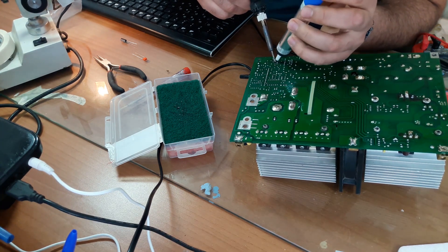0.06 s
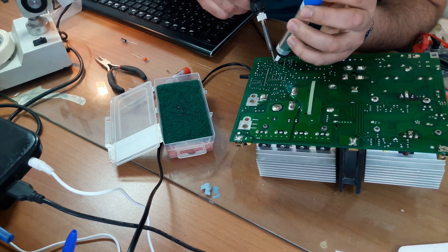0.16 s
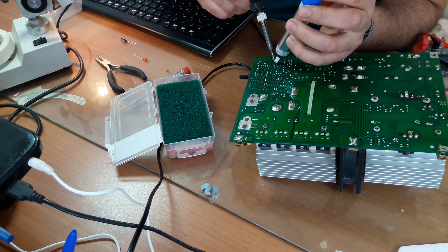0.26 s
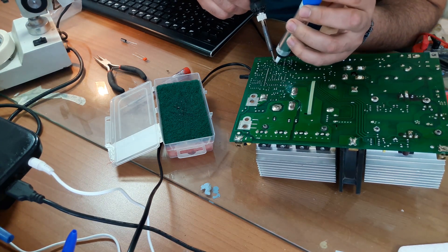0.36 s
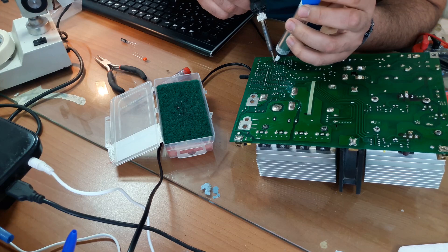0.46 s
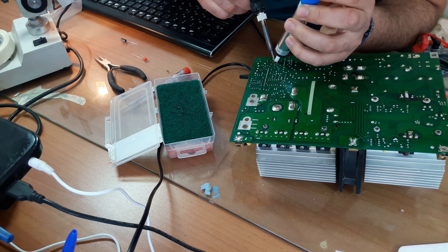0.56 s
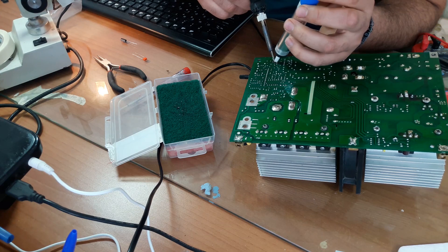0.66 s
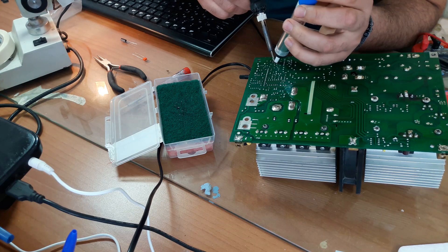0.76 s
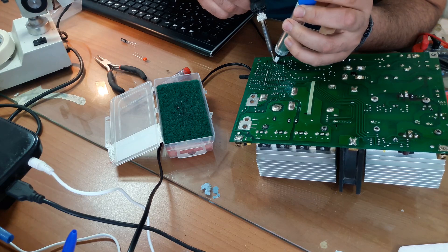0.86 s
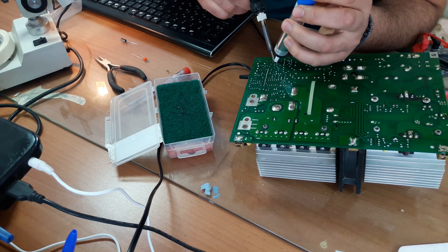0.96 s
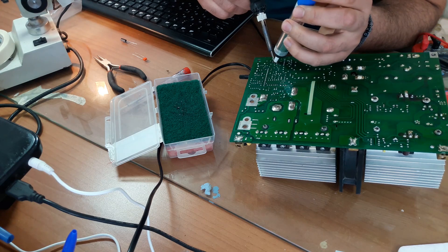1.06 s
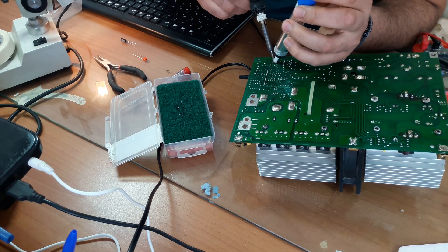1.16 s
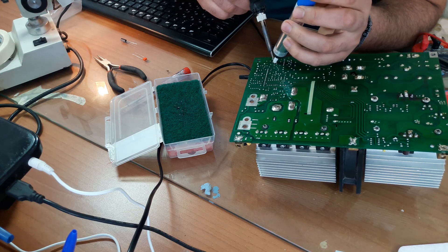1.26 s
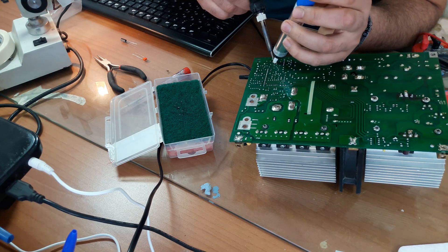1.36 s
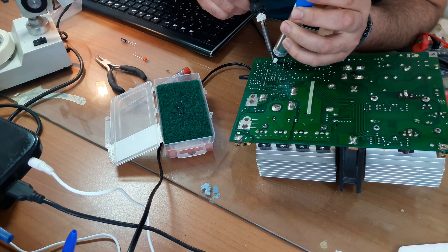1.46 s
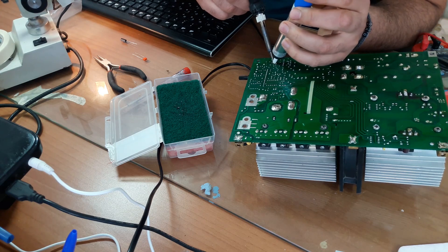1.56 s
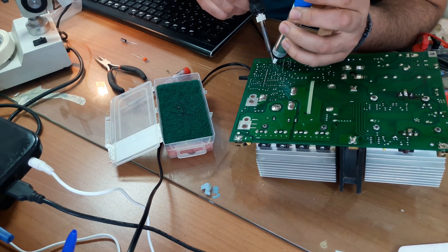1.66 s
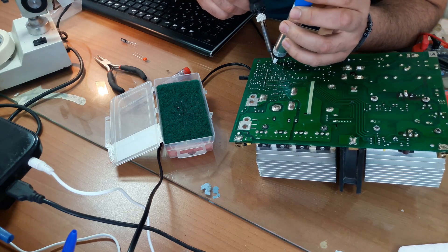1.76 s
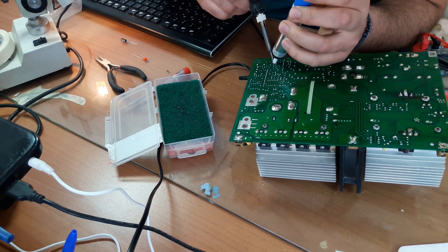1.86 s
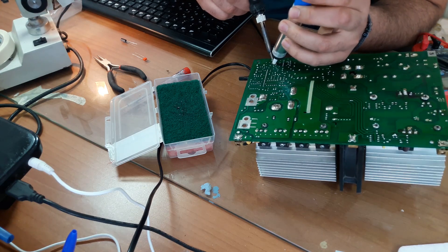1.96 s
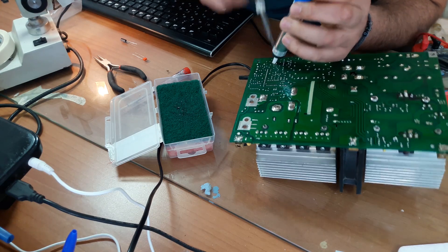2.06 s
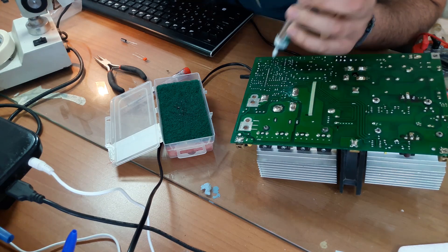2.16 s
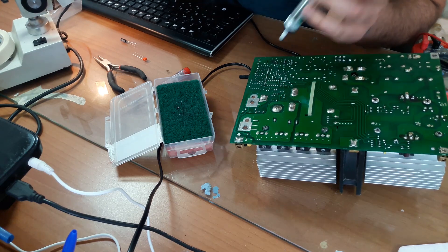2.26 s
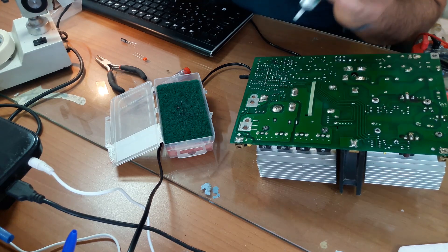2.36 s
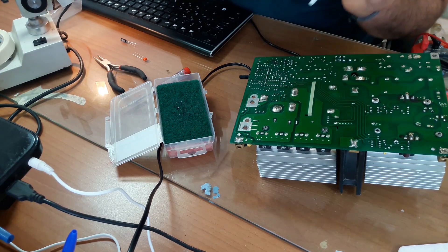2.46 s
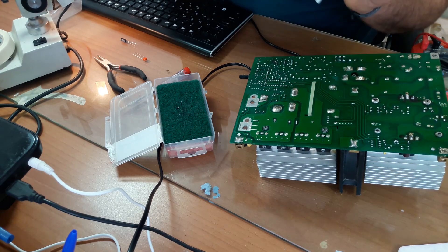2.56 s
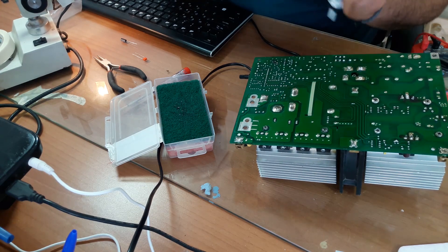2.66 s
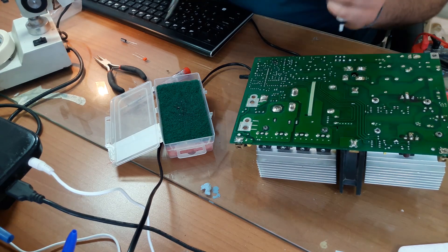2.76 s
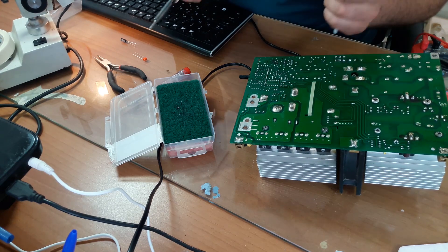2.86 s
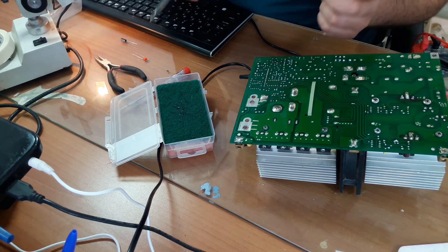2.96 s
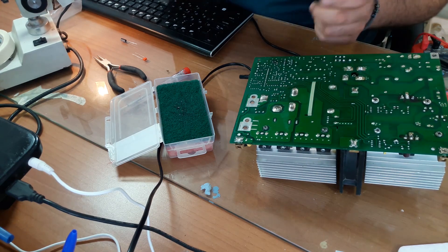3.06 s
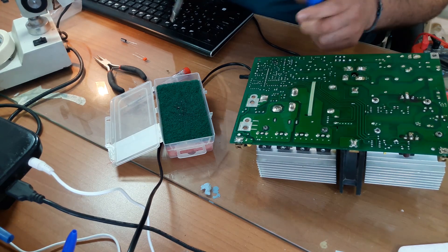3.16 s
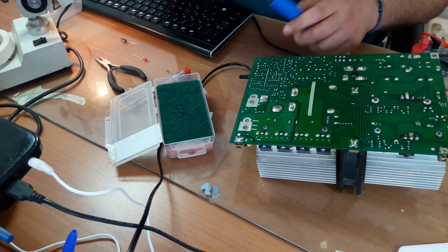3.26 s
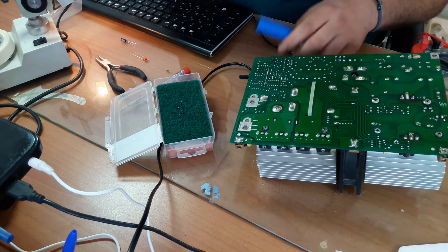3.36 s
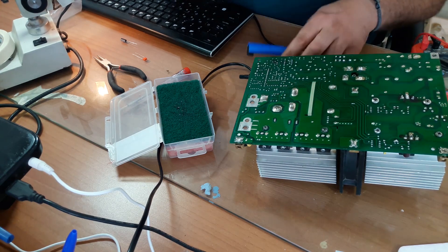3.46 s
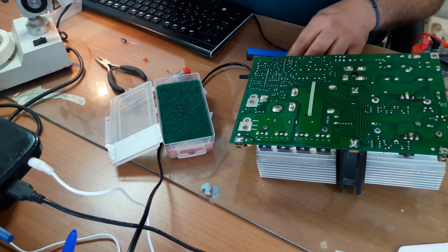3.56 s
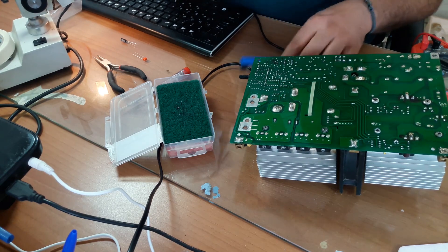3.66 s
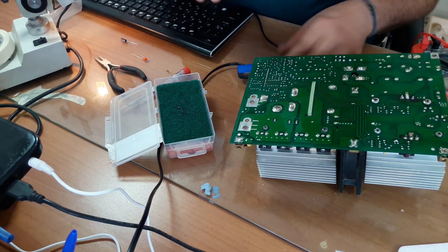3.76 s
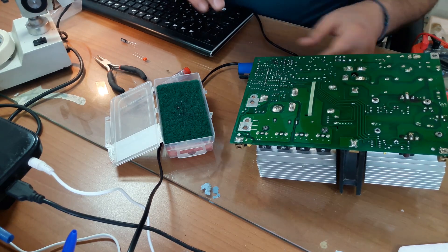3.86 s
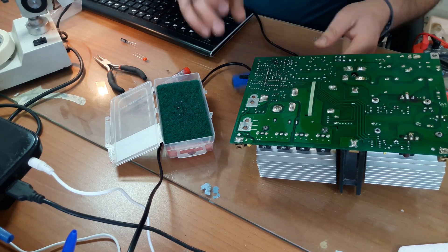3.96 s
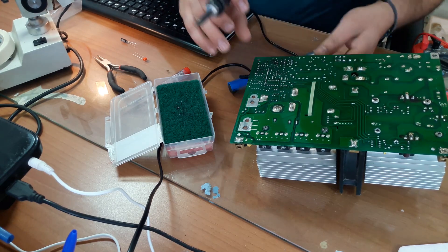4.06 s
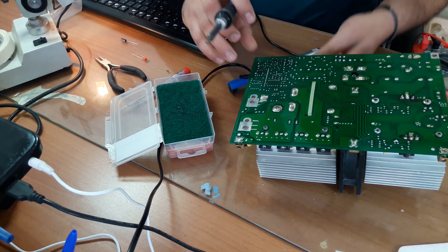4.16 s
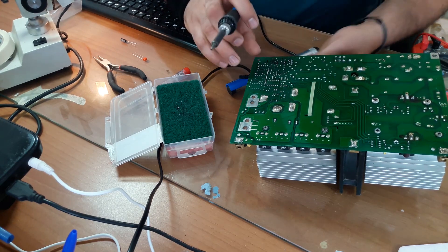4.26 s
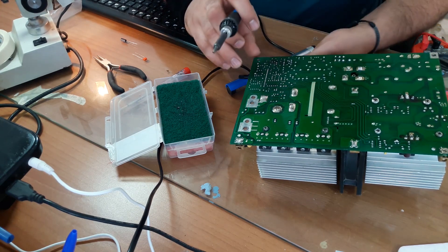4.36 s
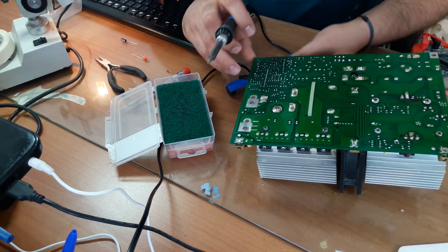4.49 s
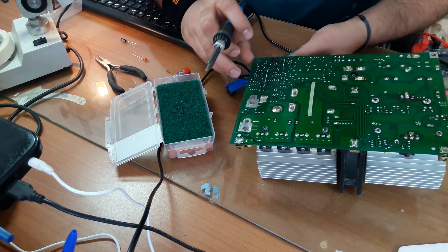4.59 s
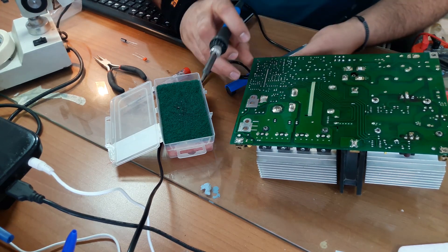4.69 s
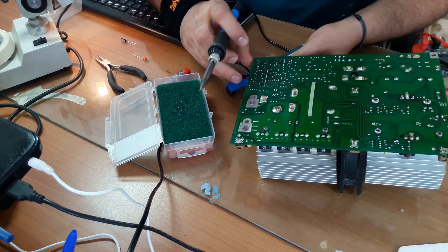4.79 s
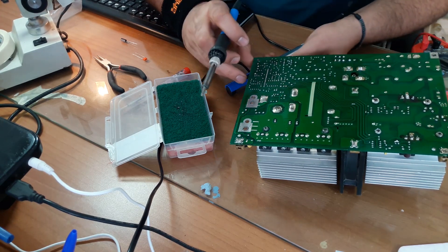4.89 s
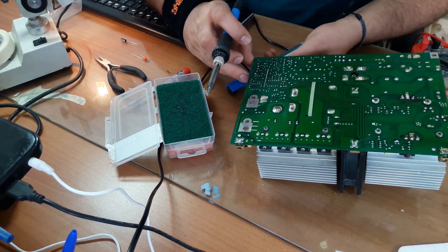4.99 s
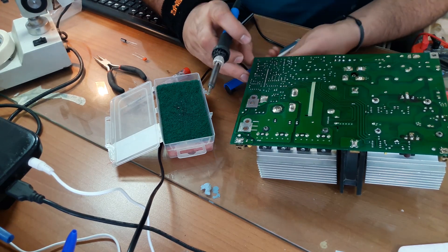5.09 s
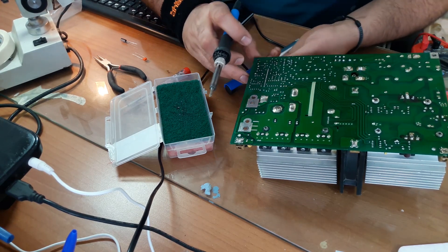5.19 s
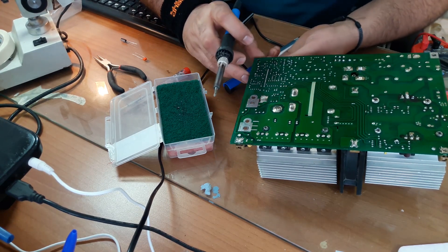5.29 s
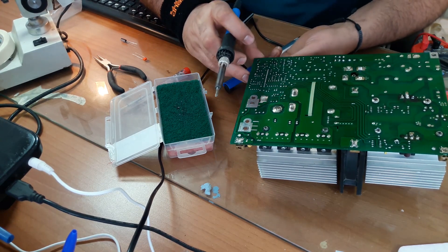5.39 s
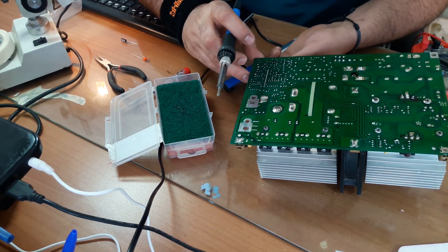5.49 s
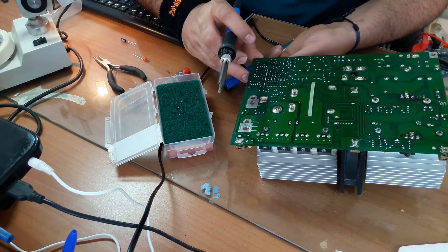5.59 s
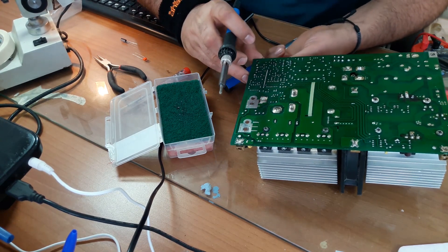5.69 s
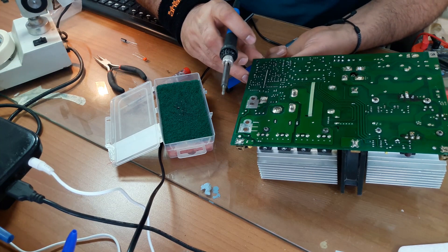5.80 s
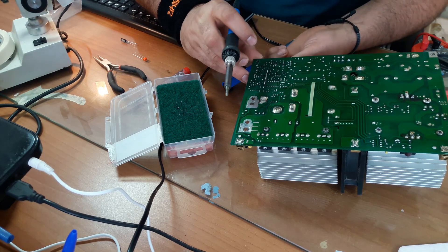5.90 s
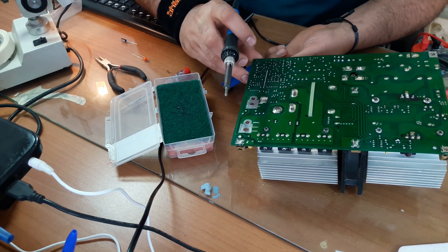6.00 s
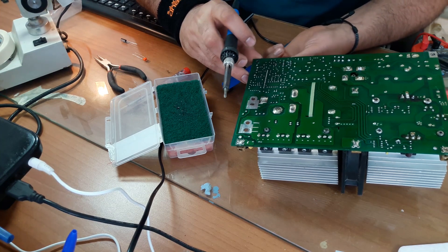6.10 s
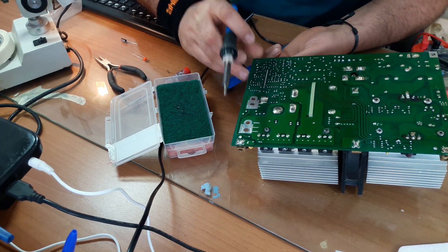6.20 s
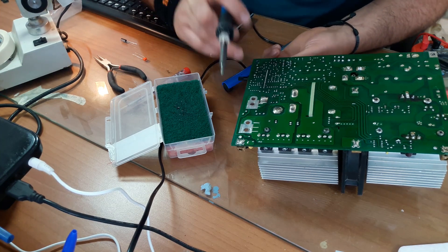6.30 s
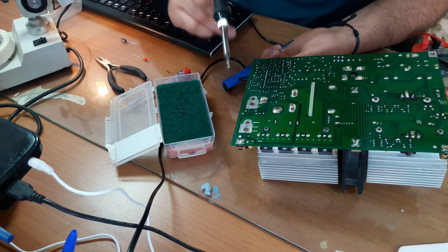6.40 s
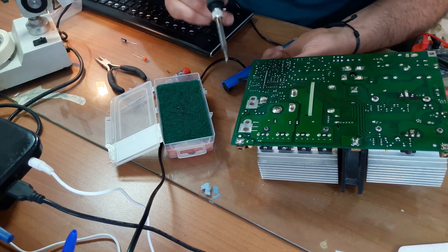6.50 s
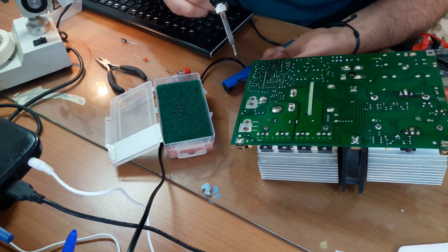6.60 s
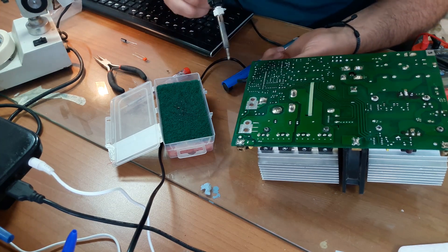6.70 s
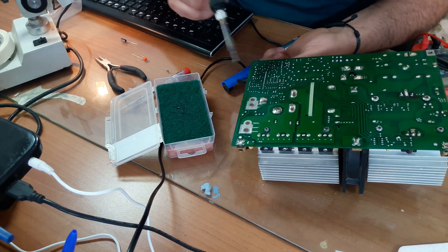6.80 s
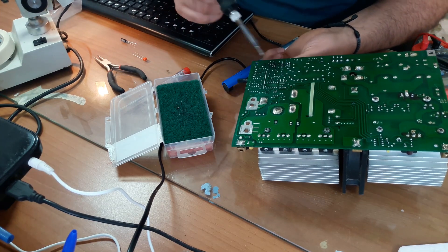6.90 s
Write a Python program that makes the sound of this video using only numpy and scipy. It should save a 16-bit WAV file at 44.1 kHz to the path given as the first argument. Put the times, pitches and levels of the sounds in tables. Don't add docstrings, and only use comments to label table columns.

```python
import sys
import numpy as np
from scipy import signal
from scipy.fft import rfft, irfft, next_fast_len
from scipy.io import wavfile
from scipy.ndimage import map_coordinates

SR = 44100
rng = np.random.default_rng(int(sys.argv[2]) if len(sys.argv) > 2 else 0)


def nominal_scale(level):
    x = np.asarray(level, float) / 20
    return 10 ** x


def unload_wav(signal):
    wavfile.write(
        sys.argv[1],
        SR,
        np.round(np.clip(np.atleast_2d(signal).T, -1, 1) * 32767).astype(np.int16),
    )


N = 306142
SPAN = 2 ** 16


def unit(x):
    return x / np.sqrt(np.mean(x ** 2) + 1e-20)


def along(points, hz):
    f, v = np.transpose(points)
    return np.interp(np.log(hz + 1), np.log(f + 1), v)


def curves(rows):
    s, *cols = np.transpose(rows)
    return [np.interp(np.arange(N) / SR, s, c) for c in cols]


def wobble(rate):
    knots = rng.standard_normal(int(N * rate / SR) + 4)
    return map_coordinates(knots, [np.arange(N) * rate / SR])


def strokes(rows, rise, fall):
    t = np.arange(N) / SR
    levels = []
    for s, hold, db in rows:
        before, after = np.maximum(s - t, 0), np.maximum(t - s - hold, 0)
        levels.append(db - rise * before - fall * after)
    return np.max(levels, axis=0)


def filtered(x, response):
    n = x.shape[-1]
    m = next_fast_len(n + SR // 4)
    return irfft(rfft(x, m) * response(np.fft.rfftfreq(m, 1 / SR)), m)[..., :n]


def body(modes):
    def response(f):
        total = 0
        for k, (centre, width, db) in enumerate(modes):
            damping = 1j * f * abs(width)
            total = total + (-1) ** k * nominal_scale(db) * damping / (centre * centre - f * f + damping)
        return total
    return response


def spread(pair, colour=lambda hz: 1):
    # f/Hz, left-right likeness
    likeness = [(130, 0.94), (290, 0.81), (640, 0.56), (1400, 0), (16000, 0.0082)]
    turn = lambda hz: np.arccos(np.clip(along(likeness, hz), -1, 1)) / 2
    mid, side = filtered(pair, lambda hz: colour(hz) * np.array([np.cos(turn(hz)), np.sin(turn(hz))]))
    return np.array([mid + side, mid - side])


def add(out, x, s):
    part = out[..., round(s * SR):][..., :x.shape[-1]]
    part += x[..., :part.shape[-1]]


def tails(count):
    # f/Hz, t60/s
    decay = [(100, 0.68), (300, 0.59), (800, .45), (2000, 0.45), (5000, 0.44), (10000, 0.35), (15000, 0.11)]
    # f/Hz, level/dB
    wall_colour = [(100, -1), (400, -3), (1000, -0.4), (3000, -2), (8000, -5.5), (15000, 3)]
    hz, t, z = signal.stft(rng.standard_normal((2, count, 3 * SR // 4)), SR, nperseg=256)
    fall_db = -60 * t / along(decay, hz)[:, None]
    two_slopes = nominal_scale(fall_db) + nominal_scale(-10.5 + 0.5 * fall_db)
    tail = signal.istft(z * two_slopes, SR, nperseg=256)[1]
    tail = tail * (1 - np.exp(-np.arange(tail.shape[-1]) / SR / 0.0093))
    pairs = [spread(tail[:, k]) for k in range(count)]
    colour = nominal_scale(along(wall_colour, np.fft.rfftfreq(SPAN, 1 / SR)))
    return [colour * rfft(p / np.linalg.norm(p[0]), SPAN) for p in pairs]


def heard(spectrum, room, pan_db, lag_s, wet_db):
    f = np.fft.rfftfreq(SPAN, 1 / SR)
    direct = nominal_scale([[pan_db / 2], [-pan_db / 2]]) * np.array([np.exp(-2j * np.pi * f * lag_s), np.ones(len(f))])
    return spectrum * (direct + nominal_scale(wet_db) * room)


def chatter(contacts, rule, count):
    s, db, cut_hz = contacts[-1]
    gap, grows, loss_db, keeps = rule
    k = np.arange(1, count + 1)
    times = s + np.cumsum(gap * grows ** (k - 1))
    return contacts + list(zip(times, db - loss_db * k, cut_hz * keeps ** k))


def struck(out, rooms, contacts, modes, pan_db, lag_s, wet_db, grit_hz, thin_hz=25):
    f, t = np.fft.rfftfreq(SPAN, 1 / SR), np.arange(256) / SR
    start, total = contacts[0][0] - .01, 0
    ring = body(modes)(f) * (1j * f / (thin_hz + 1j * f)) ** 3
    rough = f ** 2 / (f ** 2 + grit_hz ** 2)
    for k, (s, db, cut_hz) in enumerate(contacts):
        burst = rng.standard_normal(len(t)) * np.exp(-t / .0008)
        grit = rfft(burst / np.linalg.norm(burst), SPAN)
        even = ring / (1 + 1j * f / cut_hz) ** 2
        blow = even * (1 - rough + rough * grit)
        place = nominal_scale(db) / np.abs(irfft(blow, SPAN)).max() * np.exp(-2j * np.pi * f * (s - start))
        room = nominal_scale(wet_db) * even * rooms[k % len(rooms)]
        total = total + place * (heard(blow, 0, pan_db, lag_s, wet_db) + room)
    sound = np.zeros((2, N))
    add(sound, irfft(total, SPAN), start)
    return out + sound


def background():
    # t/s, level/dB
    load = [(0, -49), (.25, -57.5), (.8, -55), (1, -64.5), (1.7, -59.5), (2.3, -55), (3, -70), (3.8, -70),
            (4.3, -63), (5, -66.5), (5.7, -62), (6.2, -61), (6.45, -55.5), (6.94, -68.5)]
    # t/s, length/s, f/Hz, level/dB
    whines = [(1.45, 0.1, 500, -83), (1.7, 0.16, 487, -69.5), (5.96, 0.2, 530, -66.5),
              (6.196, 0.12, 685, -71), (6.6, .18, 530, -62)]
    # f/Hz, density/dB per Hz
    room_tone = [(33, -26), (40, -11), (65, -10), (149, -5), (174, -9), (220, -15.5), (303, -16.5),
                 (417, -20), (528, -19.5), (640, -21), (683, -21.5), (902, -17.5), (1220, -21.5),
                 (2220, -26), (5000, -45), (6500, -82.5), (11000, -120)]
    # f/Hz, width/Hz, level/dB
    standing = [(200, 32, -2.5), (300, 34, 0.5), (330, 34, 2), (391, 30, 1), (492, 16, 4), (577, 14, 3),
                (694.7, 10, 4.5)]
    # f/Hz, density/dB per Hz
    port_hiss = [(1180, -34.5), (2000, -13), (2980, -7), (3460, -6.5), (3810, -8), (7450, -16),
                 (9130, -16.5), (15100, -5.5), (16100, -18.5), (16500, -45)]
    # f/Hz, left minus right/dB
    tilt = [(60, -3), (240, -2.5), (950, -2), (3770, -1), (15000, 1)]
    drone_db, = curves(load)
    fast_hz, slow_hz, slows_at_s, slowing_s = 163.1, 143.6, .9, 0.053
    slowing = 1 - np.tanh((np.arange(N) / SR - slows_at_s) / slowing_s)
    hz = slow_hz + (fast_hz - slow_hz) / 2 * slowing
    under_db = -64.5 + .6 * (drone_db - drone_db.mean())
    drone = np.sin(2 * np.pi * np.cumsum(hz + 7 * wobble(18)) / SR) * nominal_scale(drone_db - 0.5 + 4 * wobble(28))
    under_phase = 2 * np.pi * np.cumsum(98 + 9 * wobble(15)) / SR
    drone += np.sin(under_phase) * nominal_scale(under_db + 2.2 * wobble(20))
    for s, length, pitch_hz, db in whines:
        t = np.arange(round(abs(length) * SR)) / SR
        phase = 2 * np.pi * pitch_hz * t + 1.0 * np.sin(2 * np.pi * 11 * t)
        add(drone, nominal_scale(db) * np.hanning(len(t)) ** .5 * np.sqrt(2) * np.sin(phase), s)

    rumble_db = np.maximum(strokes([(3.6, 2.9, -58)], rise=3.2, fall=3.2), -59.5)
    colour = lambda f: nominal_scale(along(room_tone, f)) * (1 + np.abs(body(standing)(f)))
    rumble = unit(spread(rng.standard_normal((2, N)), colour)) * nominal_scale(rumble_db + 0.22 * wobble(9.6))
    hiss = nominal_scale(-74.5) * unit(filtered(rng.standard_normal((2, N)), lambda f: nominal_scale(along(port_hiss, f))))
    lean = lambda f: nominal_scale(along(tilt, f) * np.array([[.5], [-.5]]))
    return filtered(rumble + drone + hiss, lean)


def pump(rooms):
    # t/s, peak level/dB, contact cut-off f/Hz
    catch = [(1.9953, -24, 39920), (1.9962, -20, 39800), (1.9972, -16.5, 40130)]
    # t/s, peak level/dB, contact cut-off f/Hz
    stop = [(2.0151, -3, 12000)]
    # t/s, peak level/dB
    far_wall = [(2.028, -26), (2.0352, -26), (2.0403, -19), (2.052, -31)]
    # t/s, peak level/dB, contact cut-off f/Hz
    cocking = [(2.49, -40.5, 400), (2.5137, -35.5, 300), (2.536, -32, 331), (2.568, -31, 328),
               (2.633, -52.5, 400)]
    # t/s, peak level/dB, contact cut-off f/Hz
    locking = [(2.489, -52.5, 5000), (2.535, -49, 2500), (2.572, -39.5, 4000), (2.576, -57, 4000)]
    # t/s, peak level/dB, contact cut-off f/Hz
    laying = [(3.7063, -20.5, 4000), (3.708, -26, 4000), (3.7113, -23.5, 7000), (3.769, -44, 3000)]
    # f/Hz, width/Hz, level/dB
    latch = [(450, 400, -8.5), (1700, 410, 0), (2600, 760, -1), (4600, 810, 0), (6800, 1800, -6),
             (9000, 1800, -5.5), (12800, 4900, -3.5), (15700, 2000, -3)]
    barrel = [(229.5, 210, -18.5), (390, 95, -7.5), (530, 120, -9), (670, 160, -1.5), (875, 123, 0.5),
              (1277, 140, -0.5), (1800, 140, 1.5), (2200, 160, -3), (2790, 400, -11), (3170, 290, -11),
              (4140, 830, -14.5), (5300, 500, -13.5), (6055, 460, -12), (7900, 2800, -18.5),
              (11500, 4000, -25.5)]
    plunger = [(308, 120, -4.5), (400, 98, -9)]
    notch = [(850, 61, 2), (1227, 86, -3), (2000, 340, -19.5), (3300, 320, -19)]
    laid = [(295, 120, -5.5), (795, 235, -2), (1270, 292, 0.5), (1573, 250, 4), (1930, 278, 1.5),
            (2800, 690, -10), (4980, 490, -19.5), (8240, 1900, -22)]
    seat_s = .0015
    seated = np.clip((stop[0][0] - np.arange(N) / SR) / seat_s + 1, 0, 1)
    rush = unit(filtered(rng.standard_normal(N), lambda f: body(latch)(f) + nominal_scale(-16)))
    air = seated * nominal_scale(strokes([(1.9955, 0.0047, -33.5)], rise=50000, fall=1600)) * rush
    stroke = rfft(air[round(1.9 * SR):round(2.1 * SR)], SPAN)
    out = np.zeros((2, N))
    add(out, irfft(heard(stroke, rooms[-1], pan_db=.1, lag_s=.00002, wet_db=-3), SPAN), 1.9)
    release = chatter(catch, (.001, 2.3, 5.5, 0.67), count=3)
    out = struck(out, rooms, release, latch, pan_db=4.5, lag_s=.00005, wet_db=-9, grit_hz=3000)
    echoes = [(s, db, 1200) for s, db in far_wall]
    slam = chatter(stop, (.0009, 1.22, 2.7, .8), count=5) + echoes
    out = struck(out, rooms, slam, barrel, pan_db=-5.0, lag_s=.00003, wet_db=-8.0, grit_hz=5000, thin_hz=79.7)
    out = struck(out, rooms, cocking, plunger, pan_db=-2.5, lag_s=.00005, wet_db=-16, grit_hz=3000, thin_hz=119)
    out = struck(out, rooms, locking, notch, pan_db=-3.5, lag_s=.00005, wet_db=-5, grit_hz=2500, thin_hz=500)
    return struck(out, rooms, laying, laid, pan_db=-5.5, lag_s=.00005, wet_db=-3.5, grit_hz=4000)


def tools(rooms):
    # t/s, peak level/dB, contact cut-off f/Hz
    clink = [(4.1494, -21, 24980), (4.1515, -23, 9000)]
    # t/s, peak level/dB, contact cut-off f/Hz
    clink_again = [(4.2451, -38.5, 9000)]
    # t/s, peak level/dB, contact cut-off f/Hz
    scuff = [(4.404, -37.5, 30500), (4.408, -41.5, 3000)]
    # t/s, peak level/dB, contact cut-off f/Hz
    knock = [(4.7129, -30, 20010), (4.7167, -49, 3000), (4.723, -35, 3000), (4.73, -42, 3000)]
    # t/s, peak level/dB, contact cut-off f/Hz
    thumps = [
        [(2.0005, -27, 700), (2.016, -27.5, 500), (2.06, -38, 200), (2.2, -37, 300), (2.25, -46.5, 300),
         (2.29, -44, 300), (2.4, -49.5, 300)],
        [(4.152, -43, 1500), (4.19, -49, 900), (4.23, -43.5, 900)],
        [(4.575, -45.5, 500), (4.597, -45.5, 300), (4.625, -48, 400), (4.714, -40, 600), (4.735, -45, 200),
         (4.755, -46, 150), (4.79, -50, 150)],
    ]
    # t/s, peak level/dB, f/Hz, length/s
    ticks = [(2.195, -42.5, 3000, 0.016), (2.31, -55, 13340, .01), (3.305, -66, 4000, 0.016),
             (3.797, -41, 4000, 0.0023), (3.902, -57, 5000, 0.0051), (4.016, -56.5, 6730, .004),
             (4.069, -48.5, 1590, 0.016), (4.572, -56, 2360, 0.043), (4.629, -59.5, 4480, 0.011),
             (5.222, -56, 800, 0.023), (5.2262, -49.5, 2730, 0.013), (5.238, -58, 4600, 0.012),
             (5.285, -59.5, 2760, 0.0088), (6.2484, -56.5, 2800, 0.03), (6.44, -61.5, 1800, 0.029),
             (6.635, -61.5, 2700, 0.063), (6.68, -66, 2900, .06), (6.76, -68.5, 2310, 0.026)]
    # f/Hz, width/Hz, level/dB
    steel = [(1500, 310, 0.5), (2320, 460, -3), (2850, 210, 0.5), (4330, 650, -5.5), (5140, 1560, -9),
             (7500, 1600, -13.5), (9000, 600, -14), (13580, 4300, -24)]
    tray = [(243, 44, 0), (685, 15, 2), (1160, 450, -10.5), (1680, 400, -9), (2240, 150, -3),
            (2900, 450, -10.5), (4730, 1000, -15), (7400, 2200, -20), (12000, 3040, -18)]
    case = [(731, 116, -2.5), (1025, 19, 7), (1292, 42, -2), (1640, 380, -12.5), (2740, 150, -9.5),
            (4600, 670, -19.5), (10070, 4900, -31.5)]
    bench = [(93, 12, -4), (150, 61, -7.5), (240, 230, -8), (321, 41, -3.5)]
    clinks = chatter(clink, (0.0022, 1.5, 4.4, 0.65), count=3) + clink_again
    out = struck(0, rooms, clinks, steel, pan_db=-5.5, lag_s=.00004, wet_db=-6.5, grit_hz=1940, thin_hz=900)
    scrapes = chatter(scuff, (.003, 1.12, 1.13, 1.04), count=11)
    out = struck(out, rooms, scrapes, tray, pan_db=-6.0, lag_s=.00004, wet_db=-6.0, grit_hz=1500)
    out = struck(out, rooms, knock, case, pan_db=-5.0, lag_s=.00004, wet_db=-10.0, grit_hz=3000)
    for contacts in thumps:
        out = struck(out, rooms, contacts, bench, pan_db=-3.0, lag_s=.00005, wet_db=-8, grit_hz=3000, thin_hz=45)
    t = np.arange(SR // 10) / SR
    for k, (s, db, hz, length) in enumerate(ticks):
        envelope = nominal_scale(-24 * t / abs(length)) * (1 - np.exp(-t / (0.071 * abs(length))))
        modes = [(hz, 0.18 * hz, 0), (1.65 * hz, .25 * hz, -6), (3 * hz, 1.5 * hz, -17)]
        grit = filtered(rng.standard_normal(len(t)) * envelope, body(modes))
        tick = rfft(nominal_scale(db) * grit / np.abs(grit).max(), SPAN)
        placed = heard(tick, rooms[k % len(rooms)], pan_db=-6.0, lag_s=.00005, wet_db=-4)
        add(out, irfft(placed, SPAN), s - .001)
    return out


def sliding():
    # t/s, hold/s, level/dB
    hisses = [(2.49, 0.082, -74.5), (2.62, 0.21, -84), (4.43, .02, -79)]
    # t/s, hold/s, level/dB
    squeaks = [(3.14, .02, -83.5), (3.32, 0.018, -86), (3.56, .1, -83)]
    # t/s, hold/s, level/dB
    rubs = [(2.63, 0.095, -60.5), (3.14, .02, -73), (3.33, 0.3, -70), (4.43, 0.017, -63),
            (4.62, 0.47, -69.5), (6.62, 0.18, -64)]
    # f/Hz, width/Hz, level/dB
    skin = [(350.6, 230, 1.5), (940, 330, -1), (2500, 350, -6.5), (3600, 560, -16), (4680, 240, -12),
            (7800, 1200, -22.5)]
    seal_db = strokes(hisses, rise=2000, fall=280)
    squeak_db = strokes(squeaks, rise=114, fall=260)
    rub_db = np.maximum(strokes(rubs, rise=160, fall=62), -82)
    seal_body, squeak_body = body([(6650, 790, 0)]), body([(6005, 280, 0)])
    seal = unit(filtered(rng.standard_normal((2, N)), lambda f: seal_body(f) ** 2))
    squeak = unit(filtered(rng.standard_normal((2, N)), lambda f: squeak_body(f) ** 2))
    rub = unit(spread(rng.standard_normal((2, N)), body(skin)))
    out = nominal_scale(seal_db + 1.4 * wobble(40.4)) * seal
    out += nominal_scale(squeak_db) * squeak
    return out + nominal_scale(rub_db + 2.5 * wobble(25)) * rub


def scene():
    rooms = tails(count=6)
    return pump(rooms) + tools(rooms) + sliding() + background()


def top_cut(x):
    return signal.sosfilt(signal.butter(12, 16680, fs=SR, output="sos"), x)


def record(dry):
    soft = dry / (1 + np.abs(dry / .7) ** 4) ** .25
    cut = signal.sosfilt(signal.butter(6, 38, "high", fs=SR, output="sos"), soft)
    cut = filtered(cut, lambda hz: hz < 15850)
    return top_cut(cut - .0005)


dry = scene()
out = record(dry)
unload_wav(out)
```